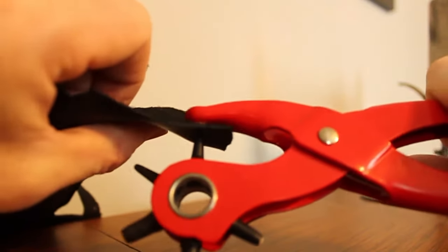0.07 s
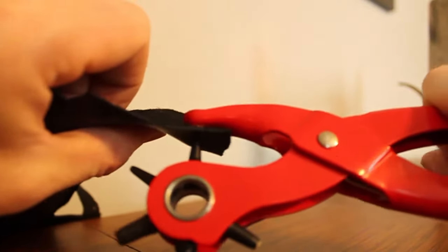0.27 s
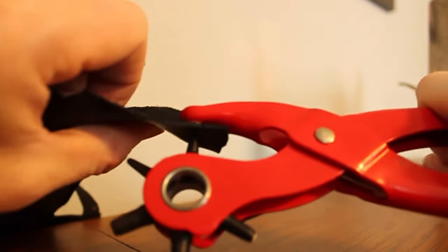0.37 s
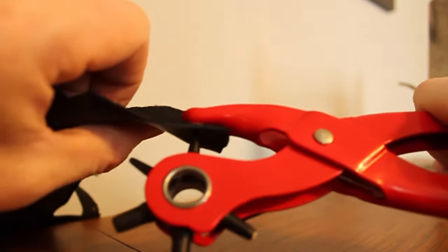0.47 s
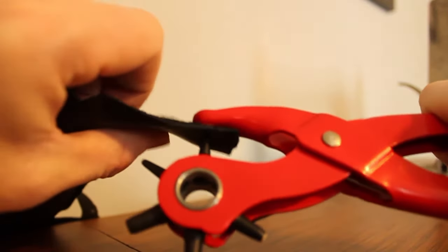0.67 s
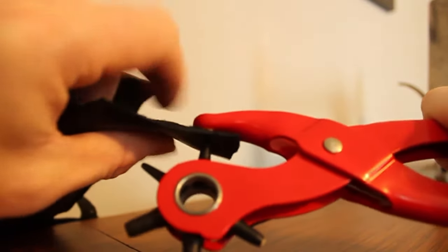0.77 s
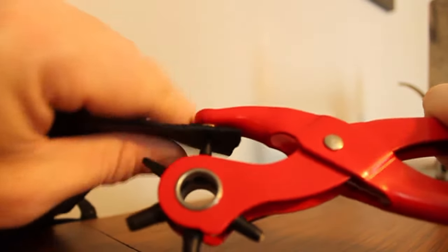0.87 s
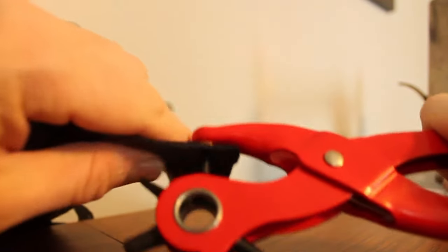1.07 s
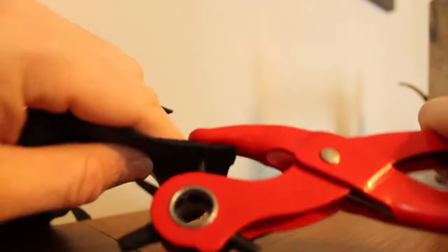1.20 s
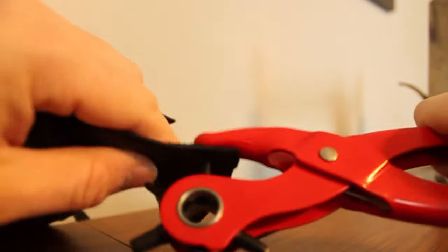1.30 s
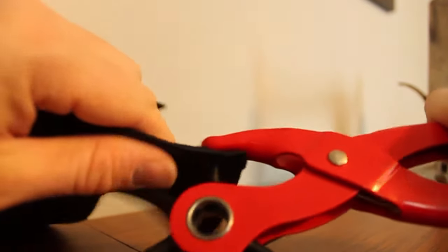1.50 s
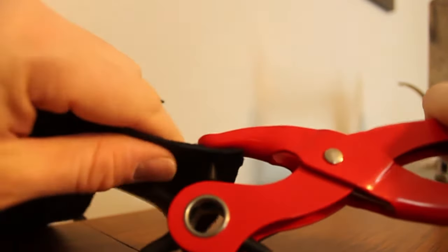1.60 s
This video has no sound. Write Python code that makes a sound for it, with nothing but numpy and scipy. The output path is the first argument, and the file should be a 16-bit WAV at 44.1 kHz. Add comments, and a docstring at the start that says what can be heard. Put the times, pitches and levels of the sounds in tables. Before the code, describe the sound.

A hand punch squeezes through leather with quick creaking clicks and one sharp steel snap. Faint finger rubbing and a few light ticks follow, heard up close in a quiet room with a faint low rumble.

```python
"""In a small quiet room, hole-punch pliers are squeezed through a leather strap close by.
Over a low hum, the punch advances by stick-slip friction, creaking and crunching, then snaps
onto its anvil. Each impact excites the modes of the steel, and pliers and room ring briefly.
A low background rumble dips after the snap and slowly swells back.
Fingers slide along the strap, which ticks lightly against the tool."""
import sys
import numpy as np
from scipy import signal
from scipy.fft import rfft, irfft
from scipy.io import wavfile

SR = 44100
rng = np.random.default_rng(int(sys.argv[2]) if len(sys.argv) > 2 else 0)


def materialize(psi):
    """Save the field psi as 16-bit PCM at rate SR to the path in sys.argv[1].

    A 1-D psi becomes a single channel; in a 2-D psi each row is a channel.
    """
    bounded = np.clip(np.atleast_2d(psi).T, -1, 1)
    quanta = np.round(bounded * 32767).astype(np.int16)
    wavfile.write(sys.argv[1], SR, quanta)


N = 72765


def undb(db):
    return 10 ** (np.asarray(db) / 20)


def unit_rms(x):
    return x / np.sqrt(np.mean(x ** 2))


def envelope(rows, column=1):
    """Gain over time, interpolated in dB."""
    rows = np.array(rows)
    return undb(np.interp(np.arange(N) / SR, rows[:, 0], rows[:, column]))


def colour(x, spectrum):
    """Spectral shaping by points in Hz and dB, scaled to unit rms."""
    hz, db = np.array(spectrum).T
    f = np.fft.rfftfreq(len(x), 1 / SR)
    gain = undb(np.interp(np.log(f + 1), np.log(hz), db))
    return unit_rms(irfft(rfft(x) * gain, len(x)))


def resonator(x, hz, width_hz):
    """A second-order resonance with unit gain at its centre."""
    return signal.lfilter(*signal.iirpeak(hz, hz / width_hz, fs=SR), x)


def decay(t, t60):
    """Exponential damping: 60 dB in t60 seconds."""
    return np.exp(-np.log(1000) * t / t60)


def add(out, start, x):
    i = int(start * SR)
    out[i:i + len(x)] += x[:N - i]


# Hum during the squeeze. Each row: time in seconds, level in dB.
HUM_LEVELS = [(0, -57), (.06, -58.5), (.12, -48), (.17, -53.5), (.24, -52.5), (.3, -62), (.37, -89.5)]
# Low rumble that dips after the snap and slowly swells back. Each row: time in seconds, level in dB.
RUMBLE_LEVELS = [(0, -54.5), (.06, -55), (.12, -52), (.18, -55.5), (.24, -52.5), (.33, -60.5), (.37, -80),
                 (.6, -77), (.78, -74), (1.0, -72.5), (1.2, -65.5), (1.28, -59), (1.42, -62.5),
                 (1.54, -56.5), (1.65, -60)]
# Spectrum of the rumble. Each row: frequency in Hz, gain in dB.
RUMBLE_SPECTRUM = [(20, -26), (55, -15), (90, -7), (118, 0), (140, -5.5), (180, -6), (280, -17),
                   (480, -14.5), (900, -39)]
# Spectrum of the still room. Each row: frequency in Hz, gain in dB.
ROOM_SPECTRUM = [(20, -18), (60, -11), (120, 0), (260, -14.5), (1200, -18.5), (5000, -22.5),
                 (16000, -38.5)]

def background(hum_hz=112.3, waver_depth=.04, floor_db=-74.5):
    """Random frequency modulation makes a hum waver; shaped noise gives the rumble and still room."""
    waver = colour(rng.standard_normal(N), [(1, 0), (15, 0), (60, -40)])
    phase = 2 * np.pi * np.cumsum(hum_hz * (1 + waver_depth * waver)) / SR
    hum = np.sqrt(2) * envelope(HUM_LEVELS) * np.sin(phase)
    rumble = envelope(RUMBLE_LEVELS) * colour(rng.standard_normal(N), RUMBLE_SPECTRUM)
    floor = undb(floor_db) * colour(rng.standard_normal(N), ROOM_SPECTRUM)
    return hum + rumble + floor


def friction(catches_per_s=2700, spread_db=5.5, catch_share=.29):
    """Friction noise: tiny catches of uneven size share the power with a smooth slide."""
    catches = (rng.random(N) < catches_per_s / SR) * rng.choice([-1, 1], N)
    sizes = undb(spread_db * np.minimum(rng.exponential(size=N), 4))
    slide = rng.standard_normal(N)
    return np.sqrt(catch_share) * unit_rms(catches * sizes) + np.sqrt(1 - catch_share) * slide


# Skin sliding on leather. Each row: time in seconds, hiss level in dB, strap body level in dB.
RUB_LEVELS = [(0, -65, -58), (.12, -65.5, -57.5), (.19, -64, -61.5), (.33, -56, -59.5), (.38, -84, -78.5),
              (.62, -90, -87), (.70, -76, -70.5), (.718, -57.5, -64), (.74, -86, -86), (.782, -66, -62.5),
              (.85, -73.5, -76), (.895, -53.5, -53.5), (.945, -66.5, -62), (1.005, -63, -60.5),
              (1.066, -54.5, -58), (1.108, -69.5, -60.5), (1.20, -61, -59.5), (1.266, -50, -57.5),
              (1.32, -56.5, -54), (1.358, -61.5, -58.5), (1.386, -45, -49), (1.426, -61, -61.5),
              (1.455, -49, -49.5), (1.478, -38, -46.5), (1.505, -50, -52.5), (1.535, -62, -56.5),
              (1.62, -59, -63.5), (1.65, -74, -50.5)]
# Spectrum of the hiss. Each row: frequency in Hz, gain in dB.
HISS_SPECTRUM = [(1000, -23.5), (2500, -4), (3800, -6.5), (5000, 0.5), (7500, -0.5), (10000, 0.5),
                 (12500, 0), (15500, -5.5)]
# Spectrum of the strap's body. Each row: frequency in Hz, gain in dB.
STRAP_SPECTRUM = [(60, -25), (250, -10.5), (550, -4), (780, -7.5), (1150, 2), (1500, -4), (2000, -9.5),
                  (2450, -6), (3000, -11), (6000, -15.5), (16000, -37)]

def finger_rub():
    """Sliding friction hisses under the fingers and excites the body of the strap."""
    hiss = envelope(RUB_LEVELS, column=1) * colour(friction(), HISS_SPECTRUM)
    body = envelope(RUB_LEVELS, column=2) * colour(friction(), STRAP_SPECTRUM)
    return hiss + body


# Taps of the strap on the tool. Each row: start in seconds, body level in dB, click level in dB.
STRAP_TAPS = [(0.0176, -32.5, -43), (0.115, -32, -44.5), (.598, -57, -62), (.743, -62, -53),
              (0.7776, -43, -51), (.816, -51.5, -56), (.9588, -32.5, -28), (1.553, -35.5, -47),
              (1.646, -32, -44)]
# Modes of the tool's body. Each row: frequency in Hz, level in dB, T60 in seconds.
TOOL_MODES = [(620, -14, 0.016), (1230, -8.5, 0.01), (1922, -5, 0.013), (2520, -3, 0.015), (3050, -5, .010),
              (3887, -8.5, 0.008)]

def strap_ticks(click_t60=.0054):
    """A light impact gives a bright click and a damped free vibration of the tool."""
    out, t = np.zeros(N), np.arange(SR // 25) / SR
    for start, body_db, click_db in STRAP_TAPS:
        burst = rng.standard_normal(len(t)) * decay(t, click_t60)
        click = resonator(burst, hz=5280, width_hz=2300)
        body = sum(undb(db) * decay(t, t60) * np.sin(2 * np.pi * (hz * t + rng.random()))
                   for hz, db, t60 in TOOL_MODES)
        add(out, start, undb(click_db) * click / np.abs(click).max() + undb(body_db) * body / 2)
    return out


# Leather giving way. Each row: time in seconds, level in dB.
CRUNCH_LEVELS = [(.19, -73), (.212, -56.5), (.235, -58), (.257, -59), (.261, -37), (.269, -44), (.285, -58),
                 (.33, -63.5), (.37, -89)]
# Spectrum of the crunch. Each row: frequency in Hz, gain in dB.
CRUNCH_SPECTRUM = [(100, -12.5), (300, -1), (700, -1), (1300, -4.5), (2000, -1), (4000, -24),
                   (16000, -47.5)]

def leather_crunch():
    """Leather yields under the punch with dull, grainy friction noise."""
    return envelope(CRUNCH_LEVELS) * colour(friction(), CRUNCH_SPECTRUM)


# Fine creak between the larger slips. Each row: time in seconds, relative level in dB.
CREAK_LEVELS = [(.19, -85), (.203, -46), (.218, -44.5), (.228, -36.5), (.243, -46.5), (.254, -37),
                (.269, -51.5), (.275, -30), (.283, -40), (.31, -56), (.33, -89.5)]
# Spectrum of the creak. Each row: frequency in Hz, gain in dB.
CREAK_SPECTRUM = [(1500, -30.5), (3800, -20), (4800, -0.5), (5900, -1), (7300, -8), (9600, -11.5),
                  (13000, -14), (16000, -18.5)]

def creak(slips_per_s=1300, gain_db=-2):
    """Stick-slip motion of steel in leather makes a dense random train of impulses."""
    slips = (rng.random(N) < slips_per_s / SR) * rng.standard_normal(N)
    return undb(gain_db) * envelope(CREAK_LEVELS) * colour(slips, CREAK_SPECTRUM)


# Slips and blows of the punch. Each row: start in seconds, peak level of the steel in dB,
# treble boost in dB, relative knock level in dB.
BLOWS = [(0.1945, -34.5, -3.5, -22.5), (0.2014, -24, -2, -21), (0.2077, -25, -2.5, -19),
         (0.2117, -12, -2, -13), (0.2125, -22, 0, -18.5), (.2215, -26, 0, -22), (0.2263, -23, 2.5, -21.5),
         (0.2271, -25, 3.5, -22), (0.2292, -18.5, -0.5, -19), (.2315, -21, 0.5, -22),
         (.2394, -26, -2, -19.5), (.2477, -30, -4, -21.5), (0.2517, -14.5, 0, -28.5),
         (.256, -24, -4, -19.5), (0.2729, -15, 4, -21), (0.2736, -16, 2.5, -24.5), (.2767, -14, 1, -23.5),
         (0.2782, -3, -4, -27), (0.2786, -16, 4.5, -19), (.3300, 0, -6, -16.5), (.3309, -5.5, -5.5, -14),
         (.3326, 1, 9.5, -26), (.3337, -15, 6.5, -22), (0.3422, -27, 7.5, -22)]
# Modes of the steel jaws. Each row: frequency in Hz, level in dB, T60 in seconds.
JAW_MODES = [(2366, -28.5, .03), (3525, -12.5, .006), (4300, -18.5, 0.0077), (5076, -10.5, 0.015),
             (5690, -2.5, 0.0046), (5974, 1, .006), (6730, -15.5, 0.0056), (8100, -20, 0.011),
             (8600, -12.5, 0.0078), (9670, -16.5, 0.011), (12170, -18.5, 0.0068), (13530, -16, .006),
             (14930, -20, 0.0048)]
# Modes of the knock. Each row: frequency in Hz, level in dB, T60 in seconds.
KNOCK_MODES = [(280, -18, 0.035), (540, -11.5, .016), (1033, -1, .009), (1420, -3.5, .008)]

def punch(treble_hz=7200, contact_s=.00019, crack_db=-14, jaw_detune=.0051, knock_detune=.067):
    """Impact excitation: each blow rings the jaws, with a crack and a dull knock through the leather."""
    out, t = np.zeros(N), np.arange(SR // 16) / SR
    for start, peak_db, treble_db, knock_db in BLOWS:
        jaw_scatter, noise, knock_scatter = rng.standard_normal((3, len(t)))
        ring, knock = 0, 0
        for (hz, db, t60), scatter in zip(JAW_MODES, jaw_scatter):
            is_treble = hz > treble_hz
            phase = 2 * np.pi * hz * (1 + jaw_detune * scatter) * t + is_treble * np.pi * scatter
            ring += undb(db + treble_db * is_treble) * decay(t, t60) * np.sin(phase)
        bright_noise = unit_rms(resonator(noise, hz=8600, width_hz=6000))
        crack = undb(crack_db + treble_db / 2) * bright_noise * decay(t, t60=.012)
        steel = (ring + crack) * (1 - np.exp(-t / contact_s))
        for k, (hz, db, t60) in enumerate(KNOCK_MODES):
            phase = 2 * np.pi * hz * (1 + knock_detune * knock_scatter[k]) * t
            knock += (-1) ** k * undb(db) * decay(t, t60) * np.sin(phase)
        add(out, start, undb(peak_db) * (steel / np.abs(steel).max() + undb(knock_db) * knock / 2))
    return out


# Lingering resonances of the pliers. Each row: centre in Hz, width in Hz, relative level in dB.
MODE_CLUSTERS = [(1680, 160, -15), (2135, 220, -3), (2410, 190, 1), (2780, 400, -10), (3338, 280, -3.5),
                 (3780, 200, -10.5), (4470, 160, -3), (4910, 260, 3), (5355, 500, -6), (6270, 310, -3),
                 (7200, 1400, -11), (8520, 550, 2), (9520, 600, -8), (11700, 2600, -14.5),
                 (14000, 2600, -19.5)]

def pliers_ring(gain_db=-42):
    """Dense clusters of modes store the energy of each blow; damping drains the high ones sooner."""
    blow_energy = np.zeros(N)
    for start, peak_db, _, _ in BLOWS:
        add(blow_energy, start, np.array([undb(peak_db) ** 2]))
    out, power = 0, 0
    for hz, width_hz, db in MODE_CLUSTERS:
        t60 = np.interp(hz, [3000, 12000], [.41, .25])
        retained = decay(1 / SR, t60) ** 2  # share of energy left after one sample
        energy = signal.lfilter([1], [1, -retained], blow_energy)
        noise = resonator(rng.standard_normal(N), hz, width_hz)
        cluster = undb(db) * resonator(noise, hz, width_hz)
        out += np.sqrt(energy) * cluster
        power += np.mean(cluster ** 2)
    return undb(gain_db) * out / np.sqrt(power)


def reverberation(x, gain_db=-23, t60=.23, build_s=.0034):
    """Convolution with a decaying noise response gives the faint diffuse tail of a small room."""
    t = np.arange(SR // 2) / SR
    reflections = resonator(rng.standard_normal(len(t)), hz=2000, width_hz=11000)
    response = reflections * decay(t, t60) * (1 - np.exp(-t / build_s))
    return undb(gain_db) * signal.fftconvolve(x, response / np.linalg.norm(response))[:N]


def scene():
    """Superposition of the sources and the room's tail in one channel."""
    direct = punch() + creak() + strap_ticks() + leather_crunch() + finger_rub()
    return (direct + pliers_ring() + reverberation(direct) + background())[None]


def record(dry, cutoff_hz=16100):
    """Clipping limits the loudest snap; a low-pass filter cuts the highest treble."""
    lowpass = signal.ellip(10, .1, 70, cutoff_hz, fs=SR, output="sos")
    return signal.sosfilt(lowpass, np.clip(dry, -1, 1))


dry = scene()
out = record(dry)
materialize(out)
```